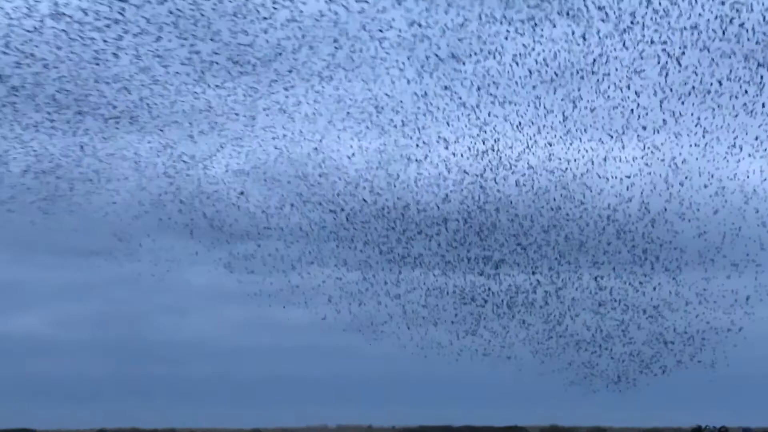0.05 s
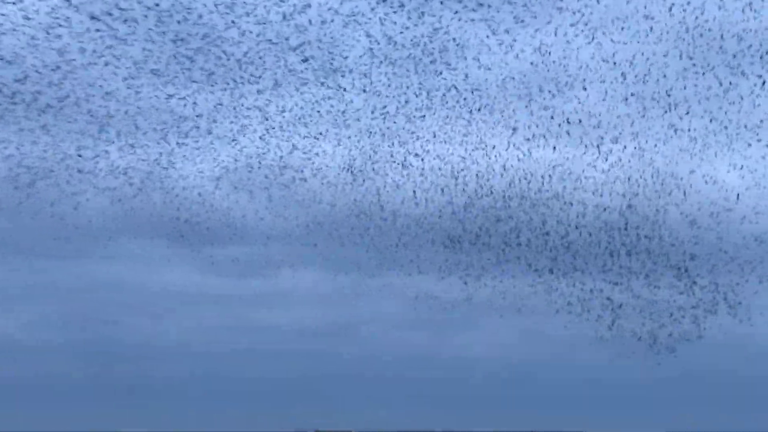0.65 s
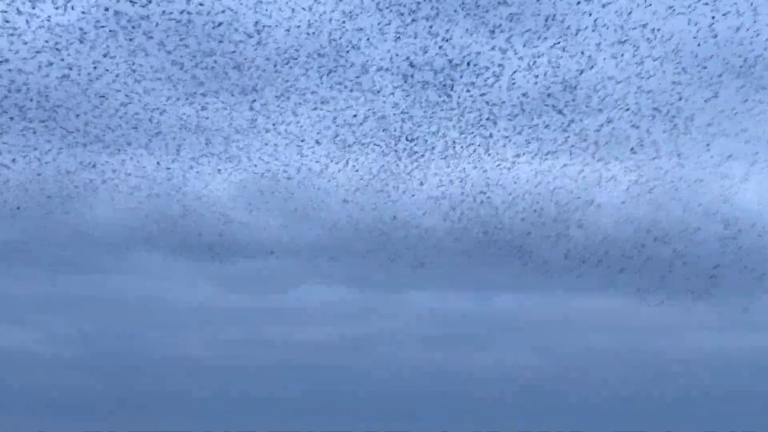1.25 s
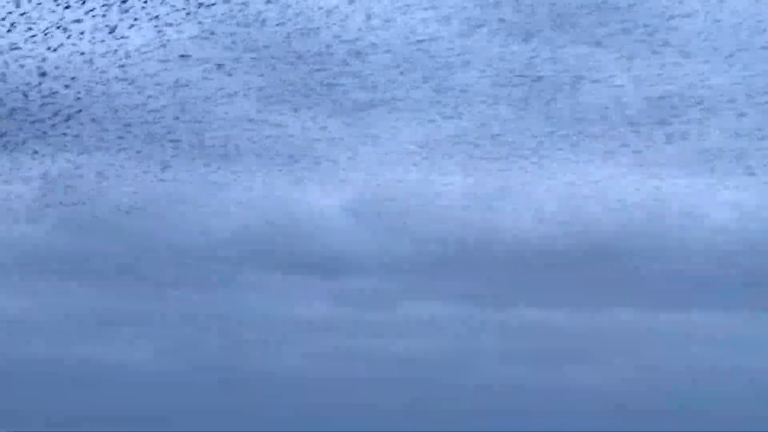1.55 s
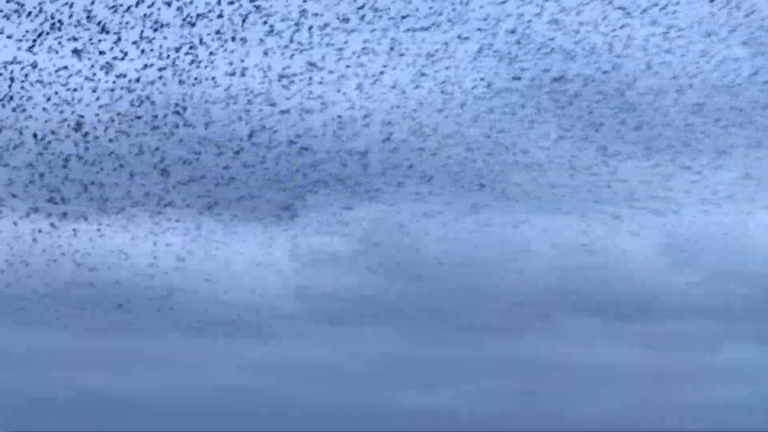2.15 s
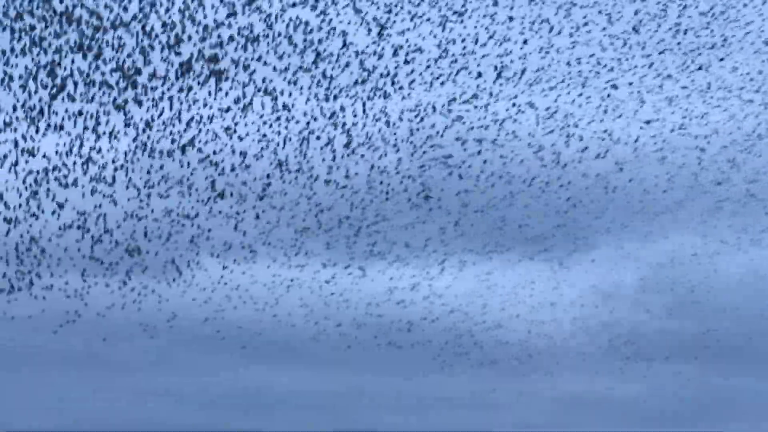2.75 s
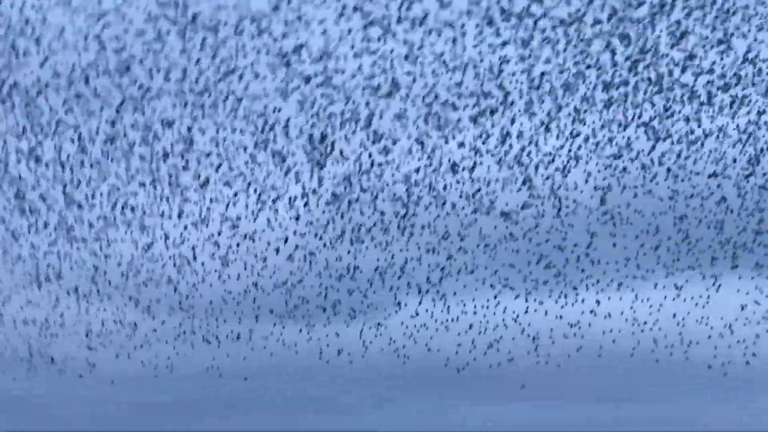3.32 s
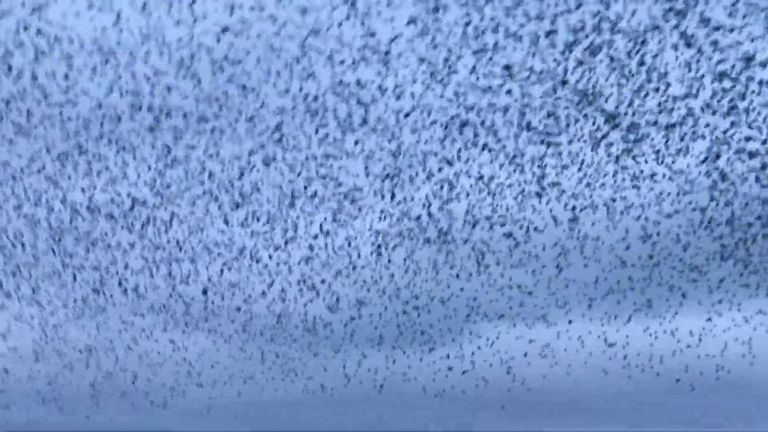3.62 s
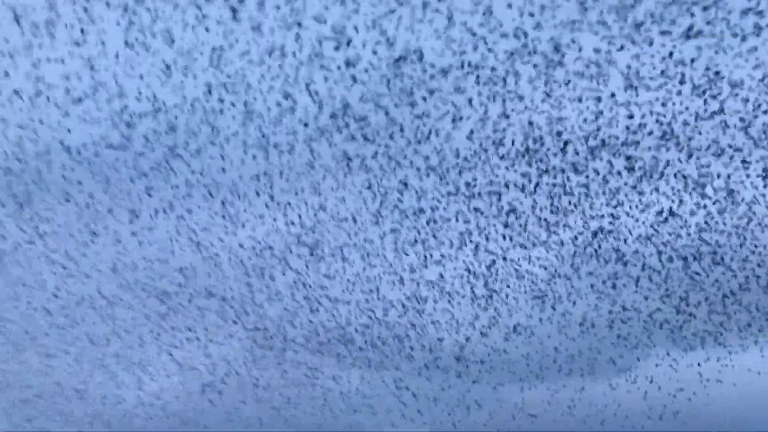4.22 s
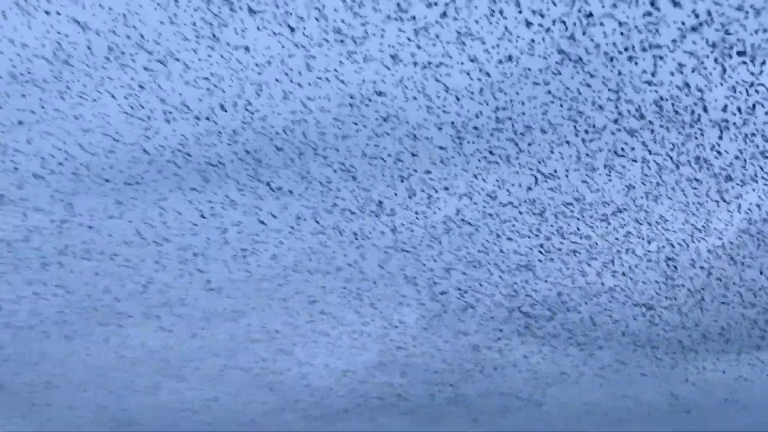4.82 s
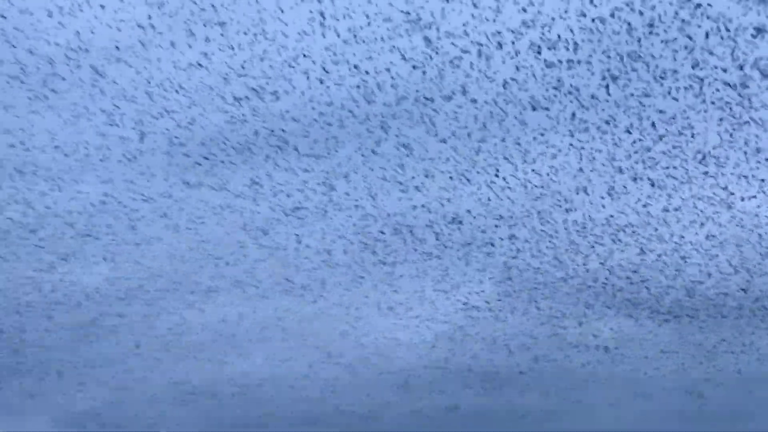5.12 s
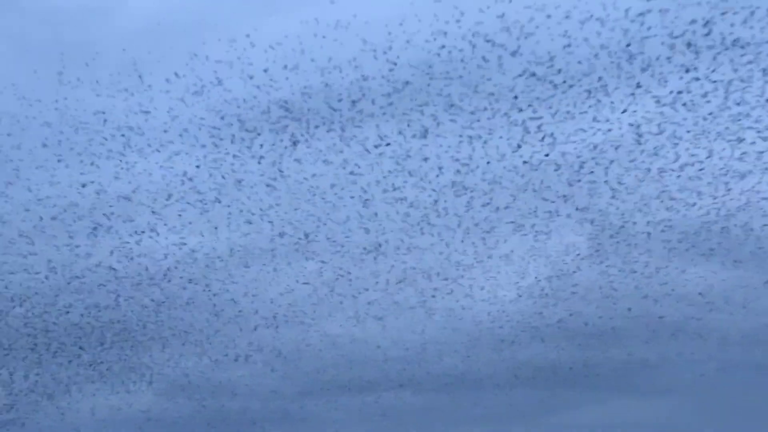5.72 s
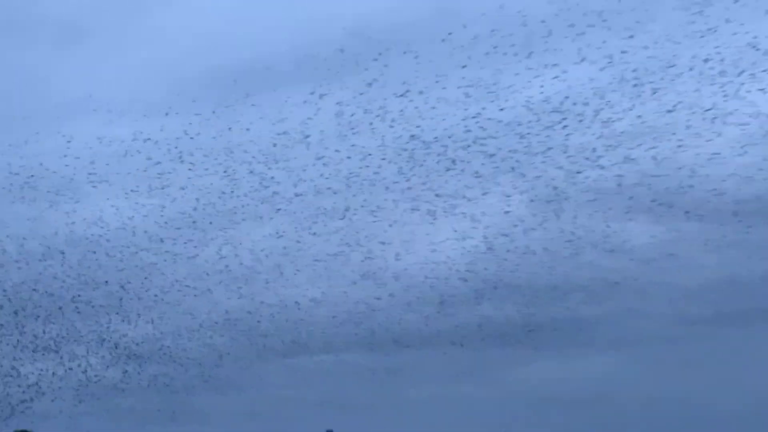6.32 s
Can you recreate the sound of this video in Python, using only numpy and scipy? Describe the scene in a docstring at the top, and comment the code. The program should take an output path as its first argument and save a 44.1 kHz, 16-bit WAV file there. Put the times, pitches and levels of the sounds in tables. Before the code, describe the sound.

Gusty wind rumbles and pops on the microphone over the soft rush of a huge flock of birds flying overhead.

```python
"""Open country: a huge flock of small birds wheels overhead while gusts hit the microphone.
Thousands of wingbeats add incoherently into a rush that swells twice; near groups swish as they bank.
Eddies striking the two microphone ports are fluctuations of pressure, heard as rumbling buffets and
short pops. The fast ones also rasp and spit; a quick, even ticking crackles during the hardest gusts."""
import sys
import numpy as np
from scipy import signal
from scipy.fft import rfft, irfft, next_fast_len
from scipy.io import wavfile
from scipy.ndimage import uniform_filter1d

SR = 44100
rng = np.random.default_rng(int(sys.argv[2]) if len(sys.argv) > 2 else 0)


def to_wav(s):
    """Save 16-bit WAV."""
    ch = np.atleast_2d(s).T  # columns
    pcm = np.round(np.clip(ch, -1, 1) * 32767)  # PCM
    wavfile.write(sys.argv[1], SR, pcm.astype(np.int16))


N = 285327
TIME = np.arange(N) / SR

# Levels in the tables are relative: each source applies its own gain.
# Rush and hiss, which swell and then dip abruptly under the strong gusts: time_s, rush_db, hiss_db
FLOCK_LEVELS = [(0, -60, -77), (.7, -54, -67.5), (1.15, -48, -60), (1.29, -49, -62), (1.75, -49.5, -62.5),
                (2.33, -51.5, -63.5), (2.52, -53, -68), (2.59, -63.5, -71), (2.73, -62.5, -72.5),
                (2.95, -57.5, -72.5), (3.58, -53.5, -68), (4.18, -51.5, -65.5), (4.26, -58, -71),
                (4.75, -61.5, -76), (5.05, -61.5, -75), (5.3, -57.5, -71.5), (5.5, -65.5, -77.5),
                (6, -58, -73.5), (6.47, -55.5, -70.5)]
# Near groups banking: centre_s, level_db, length_s, whistle_relative_db
BANKING_SWISHES = [(1.112, -45, 0.016, 0.5), (1.145, -45, 0.058, -1), (1.228, -41.5, .04, -6),
                   (1.792, -48, 0.022, 1.5), (1.803, -34, 0.0054, -6), (2.755, -55, .03, -1),
                   (3.481, -42, .03, -8.5)]
# Weight of the treble in the rush: time_s, gain_db
RUSH_TREBLE_GAIN = [(0, 2), (1.3, 0.5), (1.9, 1), (5.5, -1), (6.4, -3.5)]
# Spectra of the wing noises: frequency_hz, density_db
RUSH_SPECTRUM = [(20, -27.5), (60, -23), (120, -9), (220, 5), (450, 3.5), (750, 3), (1200, -1.5),
                 (2000, -6.5), (2800, -12.5), (4000, -21), (6000, -31.5), (12000, -47.5)]
HISS_SPECTRUM = [(1500, -13), (3000, 6), (4500, 6), (6000, 2.5), (7300, -0.5), (10000, -6.5), (12000, -12),
                 (13500, -28), (15500, -41)]
SWISH_SPECTRUM = [(300, -6), (800, 4), (1500, 3), (2200, 2), (3500, -14), (6000, -24), (12000, -39)]
WHISTLE_SPECTRUM = [(1500, -21), (2300, 5.5), (2800, 3), (4000, -8), (6000, -23), (8000, -23.5),
                    (12000, -43.5)]

# Wind between the buffets: time_s, rumble_db
BREEZE_LEVELS = [(0, -67), (.3, -88), (1.6, -79), (1.76, -64.5), (1.96, -24.5), (2.28, -32), (2.55, -25),
                 (2.76, -42), (3.05, -44), (3.48, -39.5), (3.88, -30.5), (4.02, -45.5), (4.37, -23),
                 (4.68, -22), (4.84, -28.5), (5.02, -26.5), (5.2, -38.5), (5.28, -29), (5.55, -35),
                 (5.8, -30), (5.99, -47.5), (6.2, -38), (6.47, -39)]
# Big eddies striking the microphone: centre_s, rumble_db, length_s, rasp_relative_db, pitch_hz
WIND_BUFFETS = [(0.088, -50, 0.047, -34, 601.4), (1.735, -29, 0.022, -39, 600),
                (1.843, -28, 0.019, -31, 600.6), (1.91, -18.5, 0.019, -21, 599.1),
                (1.942, -19, 0.019, -5, 800.9), (2.014, -15, .012, -9.5, 620),
                (2.053, -13, 0.023, -19.5, 801), (2.101, -18.5, 0.01, -22.5, 601.4),
                (2.167, -20.5, 0.018, -41.5, 601), (2.305, -23, 0.013, -28, 604),
                (2.36, -13.5, 0.02, -23, 600.1), (2.406, -17.5, 0.042, -17.5, 701.7),
                (2.481, -16.5, 0.021, -19, 599.9), (2.509, -15, .028, -13.5, 848.6),
                (2.544, -13.5, 0.014, -7.5, 846.3), (2.573, -28.5, 0.024, -3, 797.8),
                (2.605, -26, 0.015, -7.5, 951.3), (2.629, -17.5, 0.021, -8.5, 851.9),
                (2.652, -14, 0.026, -9.5, 748.8), (2.696, -22, 0.017, -12.5, 650),
                (2.827, -17.5, 0.024, -10, 701.8), (2.856, -27.5, 0.025, -8.5, 778.7),
                (2.875, -29, .016, 0.5, 818), (2.923, -22.5, .024, -22, 600.4),
                (3.124, -30, 0.046, -23.5, 601), (3.179, -24, 0.018, -21.5, 598.7),
                (3.329, -22.5, 0.0097, -14.5, 604), (3.346, -26.5, 0.011, -16, 610),
                (3.404, -31.5, 0.03, -25.5, 599.7), (3.526, -26, 0.02, -21, 600.3),
                (3.589, -12.5, 0.034, -16.5, 599.4), (3.626, -21, 0.019, -22.5, 600.5),
                (3.668, -21.5, 0.023, -9.5, 718.7), (3.706, -24, .012, -17.5, 749),
                (3.735, -25, 0.013, -4, 758.8), (3.806, -17, 0.0099, -7.5, 640.8),
                (3.871, -19.5, 0.0082, -4, 1048), (3.89, -16.5, 0.011, -7.5, 1050),
                (3.923, -21.5, 0.012, -4.5, 750.7), (3.941, -19, .011, -16, 851),
                (3.968, -23, 0.022, -22, 599.8), (4.078, -14, 0.022, -11.5, 662.6),
                (4.099, -17, 0.016, -24.5, 605.5), (4.171, -9.5, 0.042, -13, 660),
                (4.214, -16, 0.016, -19, 852.4), (4.229, -15.5, 0.025, -28.5, 599.1),
                (4.306, -16.5, 0.013, -19.5, 598.7), (4.351, -12.5, 0.027, -17, 747.8),
                (4.381, -21, 0.0097, -7.5, 846.6), (4.409, -15.5, 0.018, -12, 851),
                (4.44, -15, 0.019, -13.5, 618.2), (4.543, -13.5, 0.028, -20.5, 599.1),
                (4.585, -13, 0.036, -12, 750), (4.616, -10, 0.013, -14, 699.3),
                (4.633, -15, 0.016, -6.5, 830.4), (4.665, -13, 0.026, -15.5, 780.1),
                (4.71, -13, .02, -28, 598.6), (4.749, -17.5, 0.01, -10, 650),
                (4.819, -19, 0.03285, -13, 750), (4.918, -17.5, 0.035, -6.5, 780),
                (4.973, -15, 0.029, -7.5, 850.3), (4.991, -17.5, .012, -5, 1045),
                (5.049, -16.5, 0.018, -9, 699), (5.079, -22, .022, -7, 748.7),
                (5.17, -25.5, 0.016, -9.5, 1000), (5.251, -16.5, .018, -18, 751),
                (5.322, -24.5, .035, -10, 950), (5.406, -11, 0.012, -12.5, 1196),
                (5.418, -16, 0.0099, 0.5, 1250), (5.431, -17.5, 0.024, -0.5, 785),
                (5.463, -23, 0.017, -2.5, 678.5), (5.523, -31, 0.0079, -1, 621),
                (5.584, -24.5, .012, -12, 622.4), (5.611, -18, 0.0065, -15, 621.3),
                (5.663, -26, 0.017, -14.5, 620), (5.689, -20, .009, -3, 650),
                (5.705, -16, 0.019, -8, 955.3), (5.729, -17.5, 0.0093, -5, 793.4),
                (5.769, -17.5, .024, -6.5, 821), (5.804, -23, 0.026, -9.5, 1000),
                (5.898, -21, 0.013, -10, 698.7), (5.917, -19, 0.015, -19, 621.2),
                (6.072, -36, 0.026, -23, 603.5), (6.156, -17.5, 0.029, -16, 650),
                (6.197, -21.5, 0.039, -6.5, 779), (6.223, -18.5, .018, -10, 856),
                (6.249, -23.5, 0.032, -9, 753.4), (6.298, -18.5, 0.02, -12.5, 763)]
# Weight of the bass in the rumble: time_s, gain_db
RUMBLE_BASS_GAIN = [(0, 29), (1.7, 13), (2.1, 6), (3.3, 3), (4.5, 2.5), (5, -14.5), (5.9, -5), (6.4, 10.5)]
# Tight eddies hitting a port squarely: centre_s, peak_db, pitch_hz
EDDY_POPS = [(1.948, -15.5, 850), (1.978, -5.5, 330), (2.363, -7.5, 330), (2.479, -5.5, 370),
             (2.515, -0.5, 380), (2.546, -3.5, 420), (2.826, -5.5, 330), (3.325, -16, 400),
             (3.673, -9, 480), (3.805, -11.5, 430), (3.871, -13.5, 790), (3.892, -9, 710),
             (3.923, -17, 520), (3.961, -11.5, 330), (4.208, -5.5, 332.7), (4.29, -7, 300),
             (4.341, -7, 330), (4.439, -9.5, 450), (4.581, -4, 350), (4.73, -4.5, 300), (4.995, -3, 650),
             (5.407, -2.5, 320), (5.41, -7, 1100), (5.43, -3, 650), (5.464, -9.5, 522), (5.703, -11, 485),
             (6.227, -1.5, 340), (6.301, -5, 400)]
# Blasts of air spitting at the ports: centre_s, level_db, length_s, fizz_relative_db
AIR_SPITS = [(2.514, -39.5, .01, -14), (2.547, -38, 0.0068, -20), (2.574, -40, 0.011, -24),
             (2.612, -43.5, 0.028, -24), (2.659, -40.5, 0.023, -23), (2.847, -53, 0.052, -17),
             (3.892, -43, 0.0082, -20), (4.342, -41.5, 0.013, -16), (4.61, -46.5, 0.063, -10.5),
             (4.922, -41, .019, -18.5), (4.973, -45, .03, -10), (5.41, -33, 0.0092, -8),
             (5.427, -35, 0.019, -13.5), (5.704, -40.5, 0.015, -11), (5.768, -43.5, .016, -14),
             (6.301, -42.5, 0.0098, -17)]
# Spectra of the wind noises: frequency_hz, density_db
RUMBLE_SPECTRUM = [(15, -34.5), (30, -25), (60, -16.5), (120, -5), (200, -0.5), (300, 2.5), (460, 1.5),
                   (540, -10.5), (650, -16), (850, -29.5), (1200, -33.5), (3000, -83)]
RASP_SPECTRUM = [(200, -21), (450, 12), (650, 18), (950, -5), (1250, -4), (1650, -17), (2400, -40),
                 (4000, -59.5), (8000, -82.5)]
TEAR_SPECTRUM = [(600, -20), (1000, 1.5), (1400, 9), (1750, -2.5), (2600, -18), (3500, -28.5), (5000, -45),
                 (10000, -66.5)]
DEEP_SPECTRUM = [(15, -21), (30, -10), (60, 1.5), (130, 4.5), (250, 3), (600, -36.5), (2000, -81.5)]
SIZZLE_SPECTRUM = [(700, -18), (1150, 2), (1650, 3), (2100, -2), (2600, -12), (3500, -30), (6000, -60)]
FIZZ_SPECTRUM = [(1500, -10), (2600, 8), (3400, -0.5), (7000, -21), (10000, -28.5), (15000, -52.5)]

# Spells of soft crackle during the hardest gusts: centre_s, level_db, length_s
CRACKLE_SPELLS = [(2.495, -28, 0.075), (3.59, -30, 0.045), (4.175, -26.5, 0.04), (4.585, -32.5, 0.07),
                  (4.745, -36.5, 0.041), (4.96, -31, 0.062), (5.403, -37, .03), (5.786, -33, 0.046)]
# The sharpest ticks of the crackle: start_s, level_db
SHARP_TICKS = [(3.582, -21), (4.158, -24), (4.1795, -18), (4.201, -25), (4.552, -30.5), (4.606, -26),
               (4.617, -30), (4.894, -29), (4.958, -27), (5.395, -27.5), (5.758, -28), (5.769, -25.5),
               (6.195, -26.5)]
# Spectrum of one tick: frequency_hz, density_db
TICK_SPECTRUM = [(300, 4), (1500, 6), (3000, 3), (6000, -3), (8500, -10), (11000, -22), (15000, -38)]

# Bands on which the treble and bass weights act: frequency_hz, gain_db
TREBLE_BAND = [(1200, -37.5), (1700, -9.5), (2300, -1)]
BASS_BAND = [(150, -5.5), (210, -7), (280, -13), (400, -38)]
# Antiphase part of the sound at the ports, against the in-phase part: frequency_hz, gain_db
FLOCK_ANTIPHASE = [(100, -62), (900, -56.5), (1400, -31.5), (2300, -12), (4400, -4), (8000, 1),
                   (14000, 5.5)]
WIND_ANTIPHASE = [(60, -50), (120, -55), (220, -41), (400, -24.5), (700, -15.5), (1300, -5), (2400, 5),
                  (8000, 14.5)]


def flock(rush_gain_db=12.5, hiss_gain_db=4, swish_gain_db=1):
    """Incoherent addition: far wings blur into a rush; near ones hiss, and swish as they bank."""
    rush_db, hiss_db = curves(FLOCK_LEVELS)
    swish_level, whistle_level = swells(BANKING_SWISHES)
    rush = gain_of(rush_db + rush_gain_db) * wing_noise(RUSH_SPECTRUM)
    rush = shelved(rush, TREBLE_BAND, RUSH_TREBLE_GAIN)
    hiss = gain_of(hiss_db + hiss_gain_db) * wing_noise(HISS_SPECTRUM)
    banking = swish_level * wing_noise(SWISH_SPECTRUM) + whistle_level * wing_noise(WHISTLE_SPECTRUM)
    return ports(rush + hiss + gain_of(swish_gain_db) * banking, FLOCK_ANTIPHASE)


def wing_noise(spectrum, near_share=0.094, waver_db=0.71):
    """Amplitude modulation: the nearest wingbeats flutter the noise of air torn by many downstrokes."""
    flutter = np.sqrt(1 - near_share + near_share * wingbeats())
    pair = unit_rms(coloured(rng.standard_normal((2, N)) * flutter, spectrum))
    return pair * gain_of(-waver_db * wander(0.16))


def wingbeats(birds=40, beat_hz=11, stroke_cycles=0.053):
    """Independent sources add in power: each bird beats at its own rate, in bouts between glides."""
    t = TIME[::32]
    power = np.zeros(len(t))
    for pace, phase, bout, size in rng.random((birds, 4)):
        cycle = (beat_hz * (.8 + 0.49 * pace) * t + phase) % 1
        flapping = np.maximum(np.sin(2 * np.pi * ((.5 + pace) * t + bout)), 0)
        power += size ** 2 * flapping * np.exp(-((cycle - .5) / stroke_cycles) ** 2)
    return np.interp(TIME, t, power / power.mean())


def wind(rumble_power, rasp_power, pitch_hz, cores):
    """Turbulent pressure: every eddy rumbles, fast ones rasp with a hollow ring, the fastest tear."""
    swirl = wander(0.0028)  # the smallest eddies shake rumble and rasp together
    low_lumps = gain_of(4 * swirl + 5 * cores)
    high_lumps = gain_of(4.5 * swirl + 5 * cores)
    rumble = np.sqrt(rumble_power) * turbulence(RUMBLE_SPECTRUM, low_lumps, span_s=0.015)
    rumble = shelved(rumble, BASS_BAND, RUMBLE_BASS_GAIN)
    rasp_level = np.sqrt(rasp_power)
    rasp = rasp_level * turbulence(RASP_SPECTRUM, high_lumps, span_s=0.009)
    ring = rasp_level * hollow_ring(pitch_hz, high_lumps)
    # the tearing grows faster than the rasp itself
    growth = np.minimum((rasp_power / gain_of(-23.5) ** 2) ** 0.33, 2.8)
    tear = rasp_level * growth * turbulence(TEAR_SPECTRUM, high_lumps, span_s=0.0067)
    # the widest eddies follow the gusts only loosely and never quite stop
    deep = (rumble_power + gain_of(-79) ** 2) ** 0.11 * turbulence(DEEP_SPECTRUM, 1, span_s=0.087)
    pair = rumble + gain_of(-1) * rasp + gain_of(-2) * ring + gain_of(-17) * tear + gain_of(-35) * deep
    return ports(pair, WIND_ANTIPHASE)


def gusts(eddies_per_s=20, eddy_s=0.0154, eddy_db=3, breeze_rasp_db=-23.5, breeze_hz=650):
    """Addition of powers: the breeze, its small eddies and the buffets drive the rumble and the rasp."""
    arrivals = 1. * (rng.random(N) < eddies_per_s / SR)
    bell = np.exp(-(2 * (TIME[:4096] - TIME[2048]) / eddy_s) ** 2)
    eddies = abs(signal.oaconvolve(arrivals, bell, "same"))
    rumble_power = gain_of(curves(BREEZE_LEVELS)[0]) ** 2 * (1 + gain_of(eddy_db) ** 2 * eddies)
    rasp_power = rumble_power * gain_of(breeze_rasp_db) ** 2
    weighted_pitch = rasp_power * breeze_hz  # the strongest rasp sets the pitch
    cores = np.zeros(N)
    for centre_s, rumble_db, length_s, rasp_relative_db, pitch_hz in WIND_BUFFETS:
        buffet = gain_of(rumble_db) ** 2 * bump(centre_s, length_s, lean=0.064)
        puff = buffet * gain_of(rasp_relative_db) ** 2
        rumble_power += buffet
        rasp_power += puff
        weighted_pitch += puff * pitch_hz
        cores += bump(centre_s, 0.0064)  # the core of a buffet lands as one pop
    return rumble_power, rasp_power, weighted_pitch / rasp_power, cores


def hollow_ring(pitch_hz, lumps, width_hz=390, waver_share=0.0899):
    """Broad resonance: lumpy noise rings in a band whose centre moves from puff to puff."""
    centre_hz = pitch_hz * (1 + waver_share * wander(0.01197))
    carrier = np.exp(2j * np.pi * np.cumsum(centre_hz) / SR)
    lowpass = signal.butter(3, width_hz / 2, fs=SR, output="sos")
    slow_noise = signal.sosfilt(lowpass, rng.standard_normal((2, N)) * lumps)
    return steadied((carrier * slow_noise).real, span_s=0.015)


def pops(order=4.7, gain_db=-1):
    """Pressure transients: a tight eddy gives one short swing, steep in the middle, soft at its ends."""
    pair = np.zeros((2, N))
    t = np.arange(-600, 600) / SR
    for (centre_s, peak_db, pitch_hz), turns in zip(EDDY_POPS, rng.random((len(EDDY_POPS), 2))):
        phase = np.exp(2j * np.pi * turns[:, None])
        swing = phase / (1 - 2j * np.pi * pitch_hz * t / order) ** (order + 1)
        start = round(centre_s * SR) - len(t) // 2
        pair[:, start:start + len(t)] += gain_of(peak_db + gain_db) * swing.real
    return ports(pair, WIND_ANTIPHASE)


def sizzle(lumps_db=5):
    """Intermittency: air tearing at the ports spits in uneven grains; the hardest blasts fizz on top."""
    lumps = gain_of(lumps_db * wander(0.0014))
    grain_level, fizz_level = swells(AIR_SPITS)
    grains = grain_level * turbulence(SIZZLE_SPECTRUM, lumps, span_s=0.019)
    fizz = fizz_level * turbulence(FIZZ_SPECTRUM, lumps, span_s=0.013)
    return ports(grains + fizz, WIND_ANTIPHASE)


def crackle(period_s=.0107, spread_db=3):
    """Impulse train: quick, evenly spaced soft ticks and a few sharp ones, unequal left and right."""
    power = sum(gain_of(db) ** 2 * bump(centre_s, length_s) for centre_s, db, length_s in CRACKLE_SPELLS)
    train = np.sqrt(power) * (np.arange(N) % round(period_s * SR) == 0)
    for start_s, level_db in SHARP_TICKS:
        train[round(start_s * SR)] += gain_of(level_db)
    sizes = gain_of(spread_db * np.clip(rng.standard_normal((2, N)), -2, 2))
    return coloured(train * sizes, TICK_SPECTRUM)


def turbulence(spectrum, lumps, span_s):
    """Modulated noise: pressure that is lumpy in fine detail but steady in strength over span_s."""
    return steadied(coloured(rng.standard_normal((2, N)) * lumps, spectrum), span_s)


def ports(pair, antiphase_spectrum):
    """Superposition: left and right are a shared sound plus and minus an antiphase part."""
    antiphase = coloured(pair[1], antiphase_spectrum)
    return np.array([pair[0] + antiphase, pair[0] - antiphase])


def swells(rows):
    """Addition of powers: short swells sum to two amplitudes, one for the body and one for the top."""
    power = sum(np.outer(gain_of([db, db + top_db]) ** 2, bump(centre_s, length_s))
                for centre_s, db, length_s, top_db in rows)
    return np.sqrt(power)


def bump(centre_s, length_s, lean=0):
    """Gaussian envelope: with positive lean it rises faster than it falls."""
    offset = 2 * (TIME - centre_s) / length_s
    near = abs(offset) < 6
    bell = np.zeros(N)
    bell[near] = np.exp(-(offset[near] / (1 + lean * np.sign(offset[near]))) ** 2)
    return bell


def shelved(x, band, gain_rows):
    """Shelving filter: one band is raised or lowered as time passes."""
    return x + (gain_of(curves(gain_rows)[0]) - 1) * coloured(x, band)


def coloured(x, spectrum):
    """Linear filtering: the spectrum of x is multiplied by a gain curve."""
    frequency_hz, gain_db = np.transpose(spectrum)
    size = next_fast_len(N + 4096)
    bin_hz = np.fft.rfftfreq(size, 1 / SR)
    response = gain_of(np.interp(np.log(bin_hz + 1), np.log(frequency_hz), gain_db))
    return irfft(rfft(x, size) * response, size)[..., :N]


def steadied(pair, span_s):
    """Running normalisation: noise is divided by its rms over span_s."""
    return pair / np.sqrt(abs(smoothed(pair ** 2, span_s)) + 1e-12)


def wander(span_s):
    """Low-pass noise: a random drift of unit rms that changes over span_s."""
    return unit_rms(smoothed(rng.standard_normal(N), span_s))


def smoothed(x, span_s):
    """Moving average, taken twice for a triangular window."""
    size = max(2, int(span_s * SR))
    return uniform_filter1d(uniform_filter1d(x, size), size)


def curves(rows):
    """Linear interpolation in time of each level column."""
    time_s, *columns = np.transpose(rows)
    return [np.interp(TIME, time_s, column) for column in columns]


def unit_rms(x):
    """Normalisation to unit mean power."""
    return x / np.sqrt(np.mean(x ** 2) + 1e-20)


def gain_of(db):
    """Decibel law: 20 dB is tenfold in amplitude."""
    return 10 ** (np.asarray(db) / 20)


def scene():
    """Superposition of the flock above, the wind on the microphone and the crackle."""
    rumble_power, rasp_power, pitch_hz, cores = gusts()
    return flock() + wind(rumble_power, rasp_power, pitch_hz, cores) + pops() + sizzle() + crackle()


def record(dry):
    """Soft saturation rounds the highest peaks; a low-pass filter then limits the band."""
    ceiling, cutoff_hz = .95, 15700
    rounded = dry / (1 + (dry / ceiling) ** 8) ** (1 / 8)
    lowpass = signal.firwin(511, cutoff_hz, window=("kaiser", 9), fs=SR)
    return signal.oaconvolve(rounded, lowpass[None], "same")


dry = scene()
out = record(dry)
to_wav(out)
```